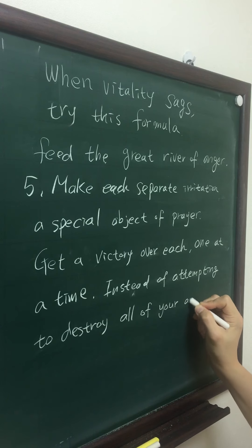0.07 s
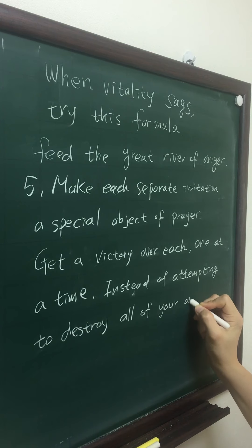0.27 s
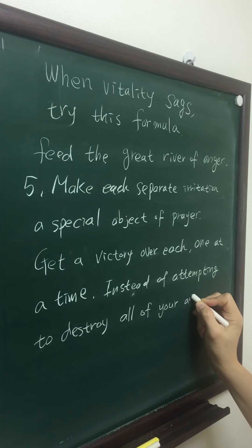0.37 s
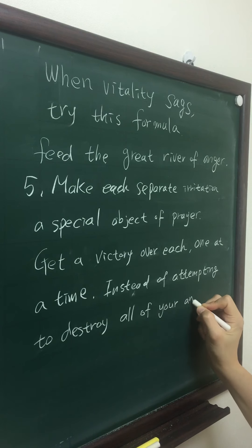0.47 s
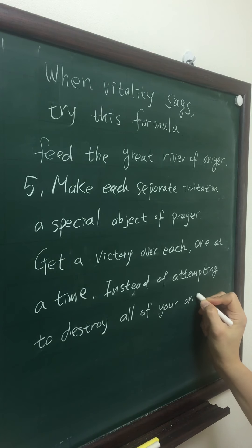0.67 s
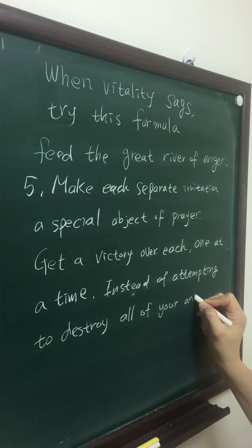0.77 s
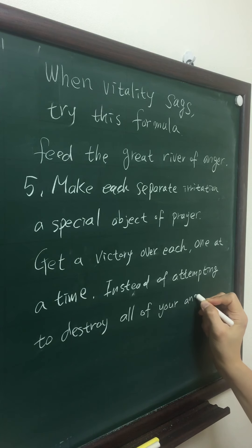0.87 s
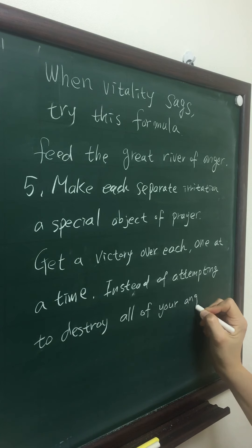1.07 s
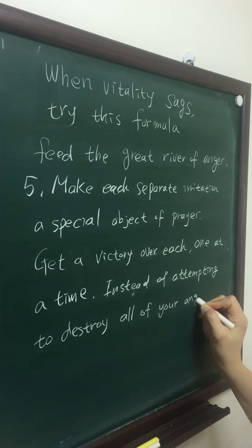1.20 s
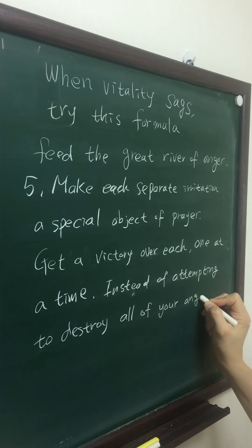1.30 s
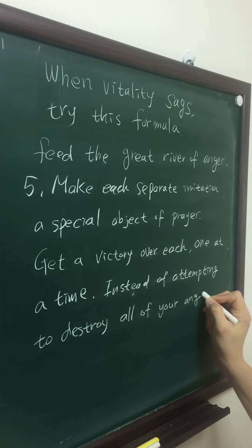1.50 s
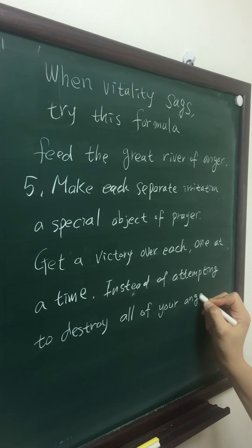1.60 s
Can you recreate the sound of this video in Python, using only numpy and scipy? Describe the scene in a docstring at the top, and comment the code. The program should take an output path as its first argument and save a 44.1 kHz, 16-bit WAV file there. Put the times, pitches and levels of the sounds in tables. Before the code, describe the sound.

Close mono sound of chalk on a board in a small, hushed room. Two sharp hollow taps stand well above thin, hissy scratches; a much softer thud comes near the end, followed by faint strokes.

```python
"""Chalk writes a few letters on a framed wall board in a small quiet room.
Short dragged strokes: random grain impulses are filtered into board rasp, a narrow ring near 3.5 kHz and hiss.
Three landings: each plays a knock through the panel, a crush of the tip, ringing modes and a dense tail.
Shaped noise lies underneath as room tone."""
import sys
import numpy as np
from scipy import signal
from scipy.fft import rfft, irfft, next_fast_len
from scipy.io import wavfile

SR = 44100
rng = np.random.default_rng(int(sys.argv[2]) if len(sys.argv) > 2 else 0)


def unload_audio(sound):
    """Save the sound as a 16-bit wav file, at the path given as the first command line argument."""
    columns = np.transpose(np.atleast_2d(sound))
    # keep every value between -1 and 1, then stretch to whole-number steps
    steps = np.round(np.clip(columns, -1, 1) * 32767)
    wavfile.write(sys.argv[1], SR, steps.astype(np.int16))


N = 72765  # length [samples]
T = np.arange(N) / SR  # time [s]


def from_db(db):
    """Decibels to gain."""
    return 10 ** (np.asarray(db) / 20)


def rms_one(x):
    """Scale to unit rms."""
    return x / np.sqrt(np.mean(x ** 2) + 1e-20)


def at_hz(points, hz):
    """Read a table on a log-frequency axis."""
    f, v = np.transpose(points)
    return np.interp(np.log(np.maximum(hz, 1)), np.log(f), v)


def colour(x, points, bend_s=0):
    """Causal minimum-phase filter with a given dB curve; bend_s delays lows as bending waves do."""
    size = 2 * next_fast_len(N)
    hz = np.arange(size // 2 + 1) * SR / size
    # folding the cepstrum forward in time gives minimum phase
    cepstrum = irfft(np.log(from_db(at_hz(points, hz))))
    cepstrum[1:size // 2] *= 2
    cepstrum[size // 2 + 1:] = 0
    # group delay is bend_s at 1 kHz and grows as 1 / sqrt(frequency)
    lag = 4 * np.pi * bend_s * np.sqrt(1000 * hz)
    response = np.exp(rfft(cepstrum) - 1j * lag)
    return irfft(rfft(x, size) * response)[:N]


def resonate(x, hz, width_hz):
    """One broad resonance: a pole pair whose radius sets the bandwidth."""
    r = np.exp(-np.pi * width_hz / SR)
    return signal.lfilter([1, 0, -1], [1, -2 * r * np.cos(2 * np.pi * hz / SR), r * r], x)


def crest(x, hz, width_hz):
    """Two equal resonances in a row: a peak with steep skirts, at unit rms."""
    return rms_one(resonate(resonate(x, hz, width_hz), hz, width_hz))


# spectral tilt of the room tone: (frequency [Hz], relative level [dB per Hz])
ROOM_TONE = [(25, -40), (45, -39.5), (70, -12), (110, -6.5), (170, -5.5), (250, -7), (400, -3), (700, -12),
             (1500, -16.5), (3000, -19), (8000, -21), (15000, -20)]
ROOM_TONE_DB = -68  # rms


def room_tone():
    """Faint steady background of the room, as shaped noise."""
    return from_db(ROOM_TONE_DB) * rms_one(colour(rng.standard_normal(N), ROOM_TONE))


GRAINS_PER_S, GRAIN_SPREAD_DB = 8000, 3
STROKE_ROOM_DB, STROKE_ROOM_T60_S = -5, 0.14


def friction(pressure):
    """Chalk crumbles in thousands of tiny uneven slips a second, heard direct and through the room."""
    spread = GRAIN_SPREAD_DB * np.minimum(rng.exponential(1, N), 4)
    sizes = from_db(spread) * rng.choice([-1, 1], N)
    slips = sizes * (rng.random(N) < GRAINS_PER_S / SR) * pressure
    room = rng.standard_normal(N) * from_db(-60 * T / STROKE_ROOM_T60_S)
    room = room / np.linalg.norm(room)
    return slips + from_db(STROKE_ROOM_DB) * signal.fftconvolve(slips, room)[:N]


# modes of the framed panel: (frequency [Hz], relative level [dB], decay t60 [s])
PANEL_MODES = [(113, -21.5, 0.18), (187.5, -12, 0.23), (253.7, -10.5, .18), (330, -2, 0.24),
               (357.4, -1.5, 0.24), (436, 2.5, 0.19), (515.6, -8, .19), (541, -6.5, .24),
               (606, -13.5, 0.15), (781.5, -2, 0.22), (821.5, -13, 0.17), (982, -16.5, 0.16),
               (1064, -9.5, .21), (1113, -9, 0.27), (1223, -12, 0.17), (1281, -10, .19), (1307, -6.5, .22),
               (1484, -10, 0.15), (1532, -11.5, .2), (1596, -13.5, .2), (1680, -12.5, .2),
               (1782, -13.5, .2), (2235, -20.5, .21), (2534, -21.5, 0.22)]
MODES_DB = -18.5  # added to every mode; 0 dB is the peak of the knock
TAIL_GAP_S, TAIL_RISE_S = 0.005, 0.0033


def build_up():
    """Waves return from the frame: silence for the gap, then a straight rise to full level."""
    return np.clip((T - TAIL_GAP_S) / TAIL_RISE_S, 0, 1)


def panel_modes():
    """Ring of the panel after a unit blow: decaying sines that build up as waves return from the frame."""
    modes = 0
    for hz, db, t60 in PANEL_MODES:
        envelope = from_db(MODES_DB + db - 60 * T / t60)
        modes = modes + envelope * np.sin(2 * np.pi * (hz * T + rng.random()))
    return modes * build_up()


# colours excited by the dragged tip, each: (frequency [Hz], relative level [dB per Hz])
BOARD_RASP = [(50, -35), (150, -25), (280, -14), (420, -5.5), (600, -10.5), (820, -19.5), (1100, 0),
              (1400, 6), (1750, -0.5), (2250, -3), (2700, -9), (4200, -26.5), (8000, -43)]
CHALK_BODY_RING = [(100, -50.5), (1800, -44.5), (2700, -15.5), (3150, 1), (3450, -1), (3720, 1.5),
                   (4050, -12.5), (5200, -26), (8000, -53)]
GRAIN_HISS = [(100, -38), (1000, -15.5), (2500, -32), (4600, -9), (5800, -3), (7100, -0.5), (8000, -1),
              (9200, 2.5), (10200, 0), (11400, 1.5), (12600, 0.5), (14000, -5), (15500, -3)]
# the strokes, with levels against unit-rms layers:
# (start [s], end [s], rise [dB/s], fall [dB/s], rasp level [dB], rasp crest [Hz], chalk ring level [dB],
#  hiss level [dB], lower crest [Hz], lower crest level [dB], upper crest [Hz], upper crest level [dB])
DRAGS = [ (0.028, 0.083, 215, 432, -77, 1260, -60.5, -60, 9300, -63.5, 11600, -63),
         (0.275, 0.325, 228, 598, -72.5, 1470, -61, -55, 7800, -62.5, 13400, -58),
         (0.411, 0.432, 415, 325, -56, 1500, -61.5, -52, 6700, -60.5, 11200, -58.5),
         (0.524, 0.565, 184.5, 413, -78.5, 1290, -63, -58, 7740, -62.5, 10700, -64.5),
         (0.81, 0.85, 177, 364, -57.5, 1495, -56, -53, 7230, -57, 13500, -56),
         (0.915, 0.953, 340, 375.5, -103, 1400, -63, -61, 7300, -70, 13300, -77),
         (0.959, 0.998, 344, 450, -63.5, 1600, -84, -89, 7150, -74, 11300, -75),
         (1.092, 1.12, 270, 327, -73.5, 1260, -55.5, -50, 10740, -53.5, 12700, -55),
         (1.226, 1.253, 389.5, 254, -51, 2000, -79, -59, 8940, -62.5, 11240, -61.5),
         (1.317, 1.367, 257, 434, -58.5, 2730, -58, -50, 9150, -56, 11100, -62.5),
         (1.505, 1.575, 279, 313, -84, 1100, -64, -62, 10500, -70.5, 11470, -65.5),
         (1.603, 1.664, 304, 370, -62, 1950, -67.5, -67, 7400, -74, 11100, -69.5)]
CHATTER_DB, CHATTER_HZ = 1, 161  # rms and low-pass corner of the pressure wobble
RASP_MODES_DB = -3  # the rasp also sets the panel modes ringing
RASP_CREST_DB, RASP_CREST_WIDTH_HZ, HISS_CREST_WIDTH_HZ = -2, 1000, 1280
EASE_S = 0.0034  # rounds the corners of each stroke


def strokes():
    """Each stroke swells, holds and fades; tip angle sets its mix of rasp, ring and hiss and their crests."""
    low_pass = signal.butter(2, CHATTER_HZ, fs=SR, output="sos")
    chatter = rms_one(signal.sosfilt(low_pass, rng.standard_normal(N)))
    pressure = from_db(CHATTER_DB * chatter)
    rasp = rms_one(colour(friction(pressure), BOARD_RASP))
    ring = rms_one(colour(friction(pressure), CHALK_BODY_RING))
    hiss = rms_one(colour(friction(pressure), GRAIN_HISS))
    rung_modes = rms_one(signal.fftconvolve(rasp, panel_modes())[:N])
    rasp = rms_one(rasp + from_db(RASP_MODES_DB) * rung_modes)
    tip = friction(pressure)
    out = np.zeros(N)
    for (start, end, rise, fall, rasp_db, rasp_hz, ring_db, hiss_db,
         lower_hz, lower_db, upper_hz, upper_db) in DRAGS:
        # softened time still to go before the start, and time gone since the end
        early = EASE_S * np.logaddexp(0, (start - T) / EASE_S)
        late = EASE_S * np.logaddexp(0, (T - end) / EASE_S)
        swell = from_db(-rise * early - fall * late)
        rasp_crest = from_db(RASP_CREST_DB) * crest(tip, rasp_hz, RASP_CREST_WIDTH_HZ)
        layers = from_db(rasp_db) * (rasp + rasp_crest)
        layers = layers + from_db(ring_db) * ring + from_db(hiss_db) * hiss
        layers = layers + from_db(lower_db) * crest(tip, lower_hz, HISS_CREST_WIDTH_HZ)
        layers = layers + from_db(upper_db) * crest(tip, upper_hz, HISS_CREST_WIDTH_HZ)
        # the swell stays silent until the last landing ahead of this stroke
        landed = max([0] + [tap[0] for tap in LANDINGS if tap[0] < start])
        out += (T >= landed) * swell * layers
    return out


# first knock of the panel: (frequency [Hz], relative level [dB])
PANEL_KNOCK = [(40, -42), (150, -25), (230, -14.5), (330, -2), (420, -1.5), (540, -5.5), (640, -15.5),
               (740, -35), (900, -14), (1130, -5.5), (1270, -12), (1520, -8.5), (1900, -31.5),
               (2700, -32.5), (3600, -19.5), (6000, -53.5), (9000, -46.5), (15000, -67.5)]
BEND_DELAY_S = .0009  # lag at 1 kHz


def knock():
    """One impulse travels the panel as bending waves, lows arriving later; peak 1."""
    blow = colour(-1. * (T == 0), PANEL_KNOCK, BEND_DELAY_S)
    return blow / abs(blow).max()


# crunch of the landing tip: (frequency [Hz], relative level [dB])
TIP_CRUSH = [(1000, -20.5), (2400, 2.5), (3500, 6.5), (4400, -0.5), (5500, -10.5), (6500, -8), (7400, -6.5),
             (9000, -23), (11000, -32), (15000, -24.5)]
CRUSH_DB, CRUSH_T60_S = -16, 0.014  # rms level at the start, and decay


def crush():
    """The tip crushes as it lands: a very short burst of coloured noise."""
    noise = rms_one(colour(rng.standard_normal(N), TIP_CRUSH))
    return noise * from_db(CRUSH_DB - 60 * T / CRUSH_T60_S)


# spectrum of the dense ring of board and room: (frequency [Hz], relative level [dB])
DENSE_RING = [(40, -26), (120, -21), (250, -5.5), (340, -2), (480, 2.5), (680, -2), (900, 1.5),
              (1100, -2.5), (1550, -1.5), (2000, -6.5), (2900, -15.5), (3600, -16.5), (5000, -18),
              (9000, -34), (15000, -40)]
# its decay: (frequency [Hz], decay t60 [s])
DENSE_RING_T60 = [(100, 0.21), (400, 0.25), (1300, 0.22), (4000, .21), (12000, 0.18)]
DENSE_RING_DB = -16.5  # rms before the decay is applied


def dense_ring():
    """Countless weak modes and reflections: noise in third-octave bands that die at their own rates."""
    hz = np.arange(N // 2 + 1) * SR / N
    spectrum = from_db(at_hz(DENSE_RING, hz)) * np.exp(2j * np.pi * rng.random(len(hz)))
    spectrum = spectrum / irfft(spectrum, N).std()
    edges = np.geomspace(25, 18000, 28)
    out = 0
    for low, high in zip(edges, edges[1:]):
        band = irfft(spectrum * (hz >= low) * (hz < high), N)
        t60 = at_hz(DENSE_RING_T60, np.sqrt(low * high))
        shape = from_db(-60 * T / t60) * build_up()
        # hold each band to its expected energy, whatever the noise draw
        level = band.std() * np.sqrt(np.mean(shape ** 2))
        out = out + rms_one(band * shape) * level
    return from_db(DENSE_RING_DB) * out


# landings of the chalk: (time [s], knock peak level before the contact filter [dB],
#  treble hardness, scaled across the contact curve [dB], bass weight at 85 Hz and below [dB])
LANDINGS = [(0.2215, -9.5, 0, 2), (0.7281, -11, -5, 0), (1.4362, -25, -27, -14.5)]


def taps():
    """Each landing plays the knock, crush, modes and dense ring of the board; soft ones lack treble."""
    board = knock() + crush() + panel_modes() + dense_ring()
    out = np.zeros(N)
    for s, db, treble_db, bass_db in LANDINGS:
        start = int(s * SR)
        contact = [(85, bass_db), (140, 0.035), (700, 0.0089), (1700, 0.27 * treble_db),
                   (2050, 0.42 * treble_db), (4000, 1.05 * treble_db), (12000, 0.93 * treble_db)]
        out[start:] += from_db(db) * colour(board, contact)[:N - start]
    return out


def scene():
    """Strokes and taps over the room tone, in mono."""
    return (room_tone() + strokes() + taps())[None]


CUTOFF_HZ = 15500


def record(dry):
    """The top is cut steeply by an elliptic low-pass."""
    return signal.sosfilt(signal.ellip(12, .1, 80, CUTOFF_HZ, fs=SR, output="sos"), dry)


dry = scene()
out = record(dry)
unload_audio(out)
```